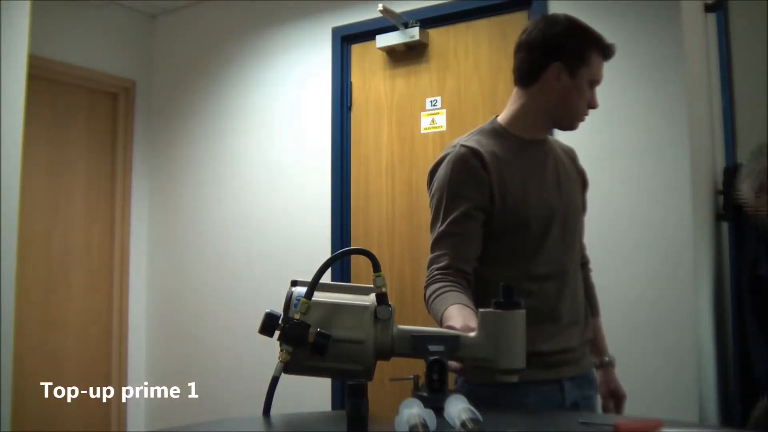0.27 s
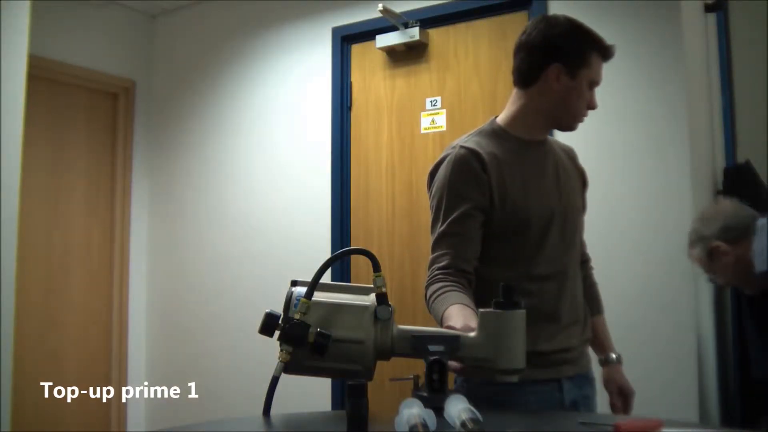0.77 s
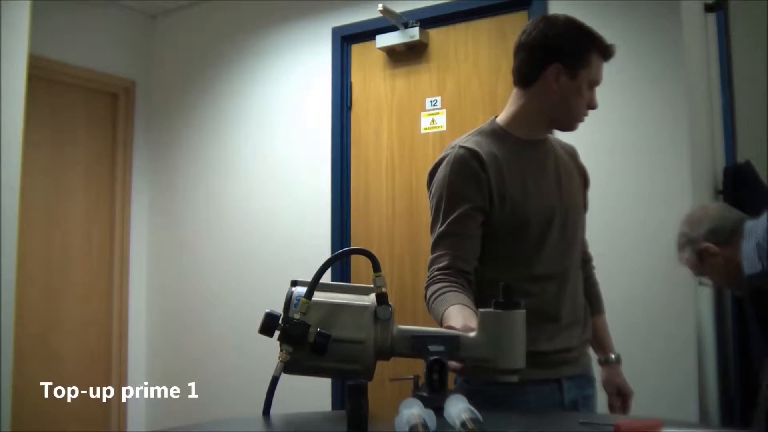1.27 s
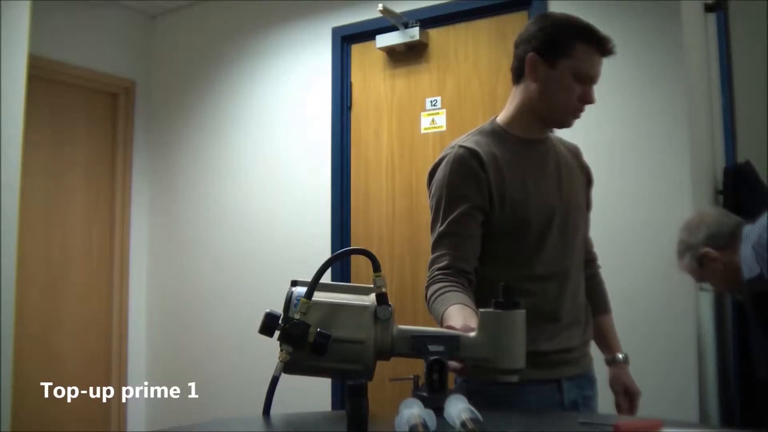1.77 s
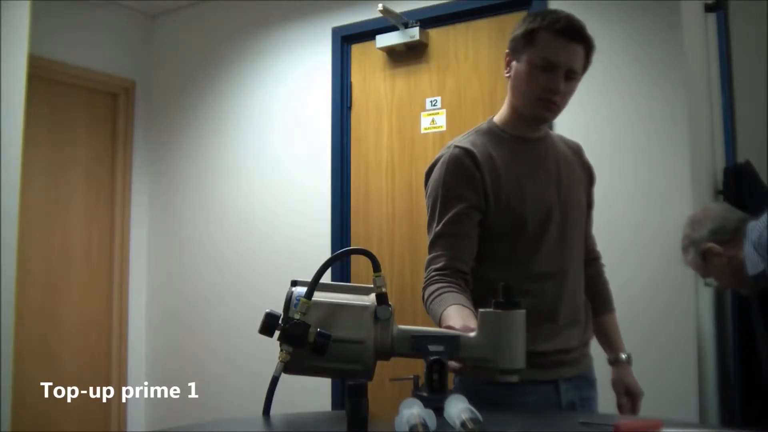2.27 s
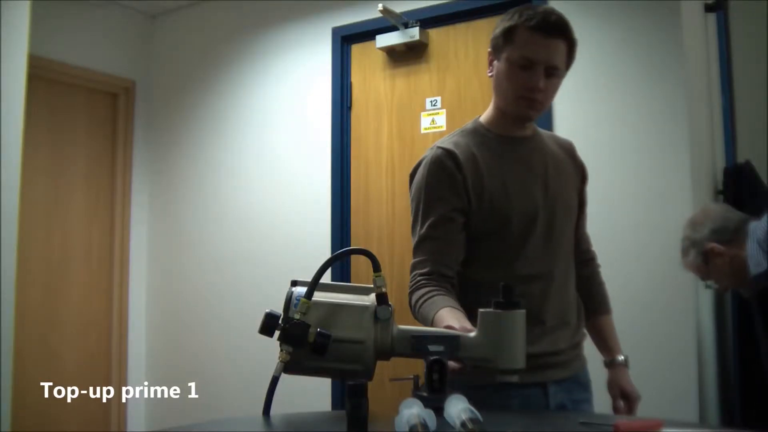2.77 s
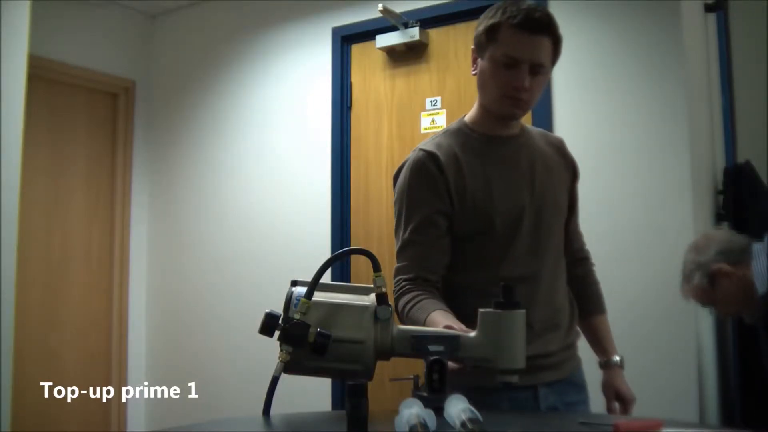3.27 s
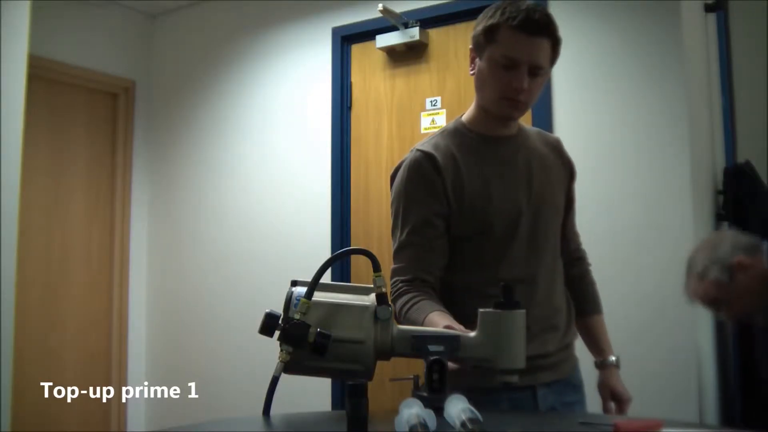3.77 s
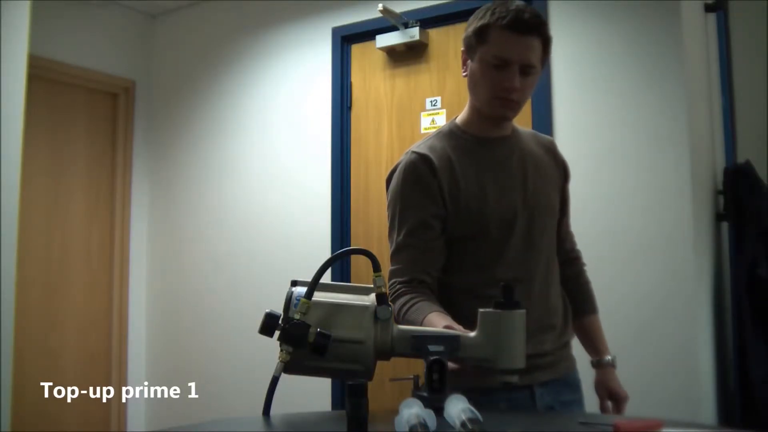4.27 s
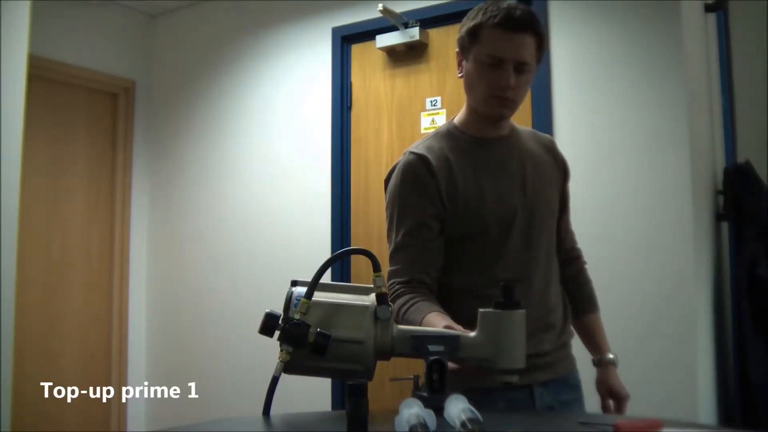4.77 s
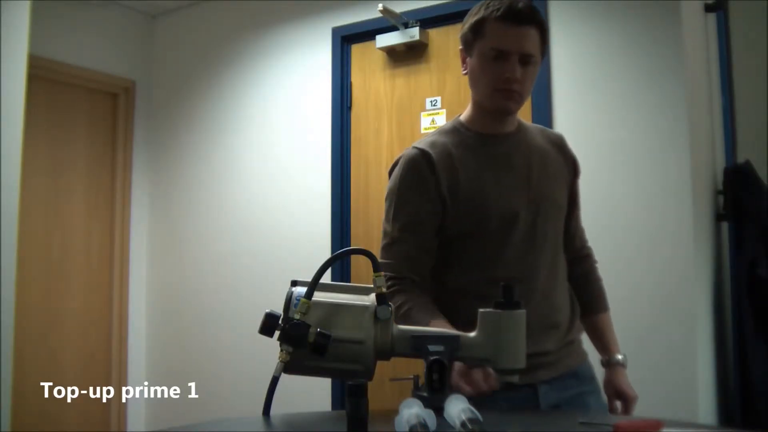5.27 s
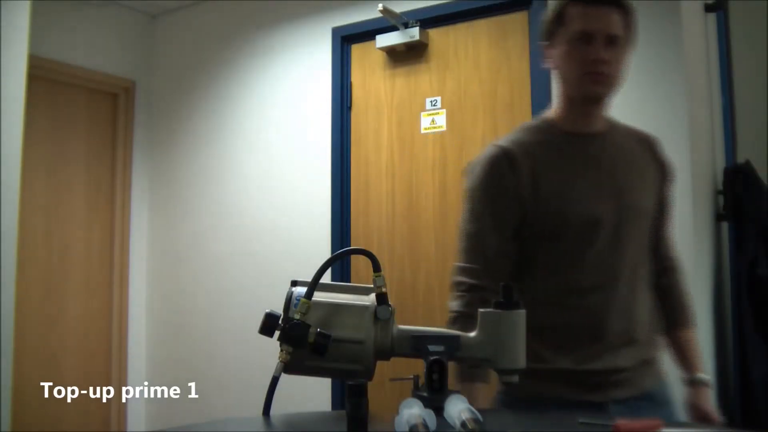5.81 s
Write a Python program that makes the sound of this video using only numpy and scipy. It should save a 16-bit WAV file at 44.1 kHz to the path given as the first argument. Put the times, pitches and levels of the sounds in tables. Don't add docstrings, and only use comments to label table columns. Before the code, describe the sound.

A steady air hiss in a small humming office, then a loud pop and roaring burst that fades, a metal tank knock, and quiet hum.

```python
import sys
import numpy as np
from scipy import signal
from scipy.fft import rfft, irfft, next_fast_len
from scipy.io import wavfile
from scipy.ndimage import uniform_filter1d

SR = 44100
rng = np.random.default_rng(int(sys.argv[2]) if len(sys.argv) > 2 else 0)


def level_to_linear(level):
    exponent = np.asarray(level, float) / 20
    return 10 ** exponent


def transcribe(signal):
    frames = np.atleast_2d(signal).T
    limited = np.clip(frames, -1, 1)
    pcm = np.round(limited * 32767).astype(np.int16)
    wavfile.write(sys.argv[1], SR, pcm)


N = 266476

# frequency in Hz, density in dB per Hz.
ROOM_COLOUR = [(9, -24), (15, 1), (54, -12), (90, -9), (132, -18), (198, -17.5), (315, -24.5), (530, -24.5),
               (893, -27.5), (2010, -31.5), (2190, -32.5), (6000, -39.5), (14000, -43), (15300, -51)]
# frequency in Hz, level in dB.
HUM = [
    (80, -49.5),
    (100, -39.5),
    (200, -51.5),
    (349, -51),
    (400, -59),
    (602, -63),
    (2010, -67),
]
# frequency in Hz, likeness from 0 to 1.
LIKENESS_ROOM = [(60, 0.75), (150, 1), (380, 0.98), (940, 0.99), (2370, 0.42), (5930, 0.28), (14800, 0.08)]
LIKENESS_LEAK = [(60, 0.94), (150, 0.97), (380, 1.0), (940, 1.0), (2370, 1), (5930, 0.66), (14800, 0.11)]
LIKENESS_BLAST = [(60, 0.95), (130, 1), (290, 1), (640, 1), (1400, 0.97), (3080, 0.83), (6760, 0.38),
                  (14800, 0.037)]
# frequency in Hz, left over right in dB.
STEREO_TILT = [(60, -1.2), (240, 0.0), (940, 0.35), (3740, 0.41), (14800, -0.3)]
# start in seconds, level in
# dB, centre in Hz, width in Hz, time to fall 60 dB in seconds.
SCUFFS = [(0.341, -37, 445, 80, 0.82), (0.588, -39, 496, 600, 0.89), (1.0, -39.5, 140, 80, 2),
          (1.02, -33, 955, 696, 0.96), (1.028, -34.5, 246, 307, 1.07), (1.03, -33, 2090, 500, .5),
          (1.19, -36.5, 443, 200, 0.96), (1.412, -13.5, 200, 300, 0.5), (1.472, -10, 212, 252, 0.19),
          (1.61, -36, 153, 60, 0.45), (2.27, -30.5, 634, 248, 1.1), (2.47, -29, 89, 60, 0.43),
          (2.572, -25, 300, 354, 0.72), (2.57, -31.5, 160, 70, 0.54), (2.63, -26, 587, 300, 0.62),
          (2.78, -23, 447, 260, 0.91), (2.899, -41, 201, 200, 3), (3.399, -36, 200, 61, 0.32),
          (1.43, -16.5, 566, 200, 0.71), (2.0, -37, 600, 90, 2.5), (1.03, -35, 50, 50, 2)]
# start in seconds, level in dB, centre in Hz,
# width in Hz, time to fall 60 dB in seconds.
BRUSHES = [(2.379, -38, 10500, 1500, .5), (4.8, -56, 6000, 6000, .03), (5.31, -46, 5000, 5000, 0.33),
           (5.37, -46, 3300, 1500, 0.14), (5.408, -39, 3230, 900, 0.15), (5.41, -46, 8000, 6000, 0.22),
           (5.44, -44, 1310, 300, 0.15), (5.485, -46, 10150, 500, 0.4), (5.49, -44, 6000, 9000, 0.42),
           (5.53, -42, 7500, 7000, 0.14), (5.71, -55, 4000, 4000, .4), (5.94, -49, 5000, 4000, 0.42),
           (5.992, -38.5, 1170, 400, .22)]
TANK_HZ = [888, 1021, 1110, 1420, 1539, 1914, 2374, 2589, 2850, 3057, 3117, 3556, 3908, 4036, 4775, 4820,
           5100, 5459, 6560, 7144, 9000, 10100]
# level in dB, time to fall 60 dB in seconds.
TANK_MODES = [(-7, 0.45), (-13, 0.59), (-9, 0.47), (-6, 0.27), (-3.5, 0.27), (-13.5, 1.4), (-6.5, 0.37),
              (-12, 0.47), (-3, 0.3), (-6, 0.38), (-7, 0.35), (-2.5, 0.28), (-2.5, 0.14), (1.5, 0.15),
              (-6, 0.28), (-9, 0.19), (-9, 0.25), (-9, 0.23), (-14, .2), (-10, 0.1), (-24, 0.12),
              (-23, 0.088)]
# time in seconds, level in dB.
KNOCKS = [
    (4.232, -21.5),
    (4.241, -27),
    (4.252, -27),
    (4.264, -36),
    (4.276, -37),
    (4.288, -33),
    (4.3, -35),
    (4.318, -39),
    (4.335, -39),
    (4.36, -35),
]
# peak in seconds, half length in seconds, level in dB.
DRONE = [
    (3.458, .02, -41),
    (3.522, .04, -36),
    (4.17, 0.16, -46),
    (4.261, 0.024, -29),
    (4.331, 0.041, -24.5),
    (4.422, 0.045, -42),
    (4.526, 0.024, -42.5),
    (4.575, 0.036, -51),
    (4.66, 0.043, -56),
]
# time in seconds, level in dB.
LEAK_LEVEL = [
    (0, -26.5),
    (1.36, -26.5),
    (2.3, -29.5),
    (2.9, -30.5),
    (3.5, -38.5),
    (4.222, -41.5),
    (4.236, -40),
    (4.434, -50.5),
    (4.7, -55),
    (5.0, -70),
]
# frequency in Hz, density in dB per Hz.
LEAK_COLOUR = [(710, -38), (1200, -11), (2480, -10.5), (3340, -0.5), (6120, -5.5), (9470, -5.5),
               (10500, -5.5), (12200, -6), (15300, -2.5)]
# frequency in Hz, width in Hz, boost in dB.
FITTING_MODES = [(3080, 2300, 11.4), (5540, 420, 6.9), (7000, 590, 4.2), (10600, 1160, 10.2),
                 (14900, 3900, 5.2)]
# time in seconds, peak in dB, swing in Hz.
POP = [
    (1.411, 0.5, 94),
]
# peak in seconds, half length in seconds, pitch in Hz,
# level in dB, drift in Hz per second.
HOSE_NOTES = [(1.424, 0.12, 2210, -12.5, 98), (1.464, 0.064, 4800, -5.5, 3000), (1.5, 0.1, 1676, -18, 100),
              (1.595, 0.13, 4750, -20.5, 100), (1.7, 0.33, 2310, -21.5, 100), (1.715, 0.21, 1740, -23, 200),
              (1.964, 0.12, 1756, -18, 100), (2.068, 0.052, 2410, -19.5, 2000),
              (2.09, 0.14, 4540, -23.5, 100), (2.238, 0.24, 2370, -22.5, -300),
              (2.297, 0.14, 3560, -24.5, -200), (2.4, 0.28, 1716, -32, 100), (2.45, 0.12, 6510, -25, -2500),
              (2.524, 0.14, 3390, -21.5, 100), (2.526, 0.062, 2500, -21, 500),
              (2.7, 0.068, 5150, -27.5, -4000), (2.73, .07, 2290, -26.5, -1000),
              (2.896, .1, 3680, -36, 100), (3.277, 0.25, 3410, -31, -1000), (3.63, 0.072, 9050, -29, -2000),
              (3.58, 0.053, 6100, -33, 100), (2.15, 0.15, 1593, -24.5, -500)]
# pitch in Hz, width in Hz.
NOTE_WIDTH = [(1750, 150), (2300, 380), (3500, 630), (4800, 2100), (5150, 880), (6500, 550), (9200, 1400)]
BLAST_EDGES_HZ = [380, 950, 3000, 6500]
# frequency in Hz, density in dB per Hz.
BLAST_COLOUR = [(59, -37), (100, -13), (123, 16), (312, -5), (446, -9), (495, -11), (1420, -11), (1830, -7),
                (1990, -7.5), (2350, -8.5), (8140, -12.5), (11400, -9), (15300, -16)]
# creep in dB, surge in dB, late surge decay in dB per second,
# flow in dB, flow sag in dB per second.
JET_BANDS = [
    (-30, -18, 251, -36.5, 3),
    (-30, -15.5, 53, -15.5, 10.5),
    (-29, -7.5, 151, -19, 8.5),
    (-22, -8.5, 204, -25, 7),
]
# peak in seconds, half length in seconds, centre in Hz,
# level in dB.
GUSTS = [(1.967, 0.18, 1680, -26), (2.331, 0.068, 1720, -19.5), (2.39, 0.045, 9000, -27.5),
         (2.51, 0.039, 4700, -29.5), (2.608, 0.05, 650, -29), (2.685, 0.12, 3470, -22.5),
         (2.788, 0.19, 600, -32.5), (3.077, .1, 2150, -22), (3.178, 0.12, 2200, -28),
         (3.575, 0.058, 7500, -28), (3.658, 0.11, 6260, -28.5), (3.56, .06, 600, -38)]

POP_S = POP[0][0]
QUICK = 0.79


def evened(x):
    return x / np.sqrt(np.mean(x ** 2) + 1e-20)


def read(points, hz):
    f, value = np.transpose(points)
    return np.interp(np.log(hz + 1), np.log(f + 1), value)


def hump(t, peak, half):
    return np.exp(-((t - peak) / (half * np.where(t < peak, QUICK, 1))) ** 2)


def wander(hz):
    size = next_fast_len(N)
    z = rfft(rng.standard_normal(size))
    slow = z / (1 + (np.fft.rfftfreq(size, 1 / SR) / hz) ** 2)
    return evened(irfft(slow, size)[:N])


def resonate(x, hz, width):
    turn = np.exp(2j * np.pi * np.cumsum(hz * np.ones(x.shape[-1])) / SR)
    r = np.exp(-np.pi * width / SR)
    return 2 * (turn * signal.lfilter([1 - r], [1, -r], x / turn)).real


def coloured(x, gain):
    size = next_fast_len(N)
    z = rfft(x, size) * gain(np.fft.rfftfreq(size, 1 / SR))
    return evened(irfft(z, size)[:, :N])


def echoes(t60, wet_db):
    t = np.arange(SR // 3) / SR
    tail = rng.standard_normal(len(t)) * level_to_linear(-60 * t / t60) * (t > .003)
    tail *= level_to_linear(wet_db) / np.linalg.norm(tail)
    tail[0] = 1
    return tail / np.linalg.norm(tail)


def air(likeness, patchy_db, wet_db, pan_db=0):
    frames, hz = N // 256 + 5, np.fft.rfftfreq(1024, 1 / SR)
    a, b, c, d, patches = rng.standard_normal((frames, 513, 5)).T
    patches = uniform_filter1d(patches, size=10, axis=0)
    patches = evened(uniform_filter1d(patches, size=14, axis=1))
    same = np.clip(read(likeness, hz), -1, 1)[:, None]
    left = a + 1j * b
    right = same * left + np.sqrt(1 - same ** 2) * (c + 1j * d)
    lean_db = (read(STEREO_TILT, hz)[:, None] + pan_db) / 2
    z = np.array([left, right]) * level_to_linear(patchy_db * patches + np.array([lean_db, -lean_db]))
    x = signal.istft(z, nperseg=1024, noverlap=768)[1][:, :N]
    return signal.oaconvolve(x, echoes(0.29, wet_db)[None], axes=1)[:, :N]


def room():
    t = np.arange(N) / SR
    wash = air(LIKENESS_ROOM, patchy_db=1.85, wet_db=-10.0, pan_db=-0.5)
    wash = coloured(wash, lambda hz: level_to_linear(read(ROOM_COLOUR, hz)))
    hum = 0
    for hz, db in HUM:
        level = level_to_linear(db + 0.44 * wander(hz=4.8)) * np.sqrt(2)
        hum = hum + level * np.sin(2 * np.pi * (hz * t + 0.023 * wander(hz=1.1)))
    hum = hum * level_to_linear(np.array([[-.8], [.8]]))
    fall_s, hold_s, back_s, depth_db = 0.23, 0.51, 0.52, -10
    duck_db = np.interp(t, POP_S + np.cumsum([0, fall_s, hold_s, back_s]), [0, depth_db, depth_db, 0])
    return level_to_linear(0.86 * duck_db - 37) * wash + level_to_linear(duck_db) * hum


def rustles():
    out, t = np.zeros((2, N)), np.arange(SR * 2 // 3) / SR
    for table, rise in [(SCUFFS, 0.039), (BRUSHES, 0.012)]:
        for s, db, hz, width, t60 in table:
            mid, side = rng.standard_normal((2, len(t)))
            wide = np.clip(hz / 9000, 0, 1)
            puff = mid + wide * np.array([side, -side])
            puff = evened(resonate(resonate(puff, hz, width), hz, width))
            puff = puff * np.minimum(t / (rise * t60), 1) * level_to_linear(db - 60 * t / t60)
            part = out[:, round(s * SR):][:, :len(t)]
            part += puff[:, :part.shape[1]]
    return out


def knock_ring(since, rise, t60):
    energy = 0
    for u, (_, db) in zip(since, KNOCKS):
        energy = energy + np.minimum(u / rise, 1) * level_to_linear(2 * db - 120 * u / t60)
    return np.sqrt(energy)


def tank():
    t, when = np.arange(SR) / SR, np.transpose(KNOCKS)[0]
    since = np.maximum(t + when[0] - when[:, None], 0)
    rattle = knock_ring(since, 0.003, 0.24) * rng.standard_normal(SR)
    clank = level_to_linear(4.5) * resonate(resonate(rattle, 910, 1050), 1100, 3000)
    clank += level_to_linear(-4) * resonate(resonate(rattle, 2300, 2300), 2600, 3600)
    clank += level_to_linear(-20) * resonate(resonate(rattle, 5200, 2000), 5200, 2500)
    for hz, (db, t60) in zip(TANK_HZ, TANK_MODES):
        beat, turn = rng.random(2)
        pair = 1 + 0.97 * np.cos(2 * np.pi * ((8 + 14 * beat) * t + turn))
        tone = pair * np.sin(2 * np.pi * (hz * t + turn))
        clank += level_to_linear(db - 9.0) * knock_ring(since, 0.0048, t60) * tone
    out = np.zeros((2, N))
    for ear in out:
        ear[round(when[0] * SR):][:SR] = signal.oaconvolve(clank, echoes(0.68, wet_db=-6.5))[:SR]
    note = np.sqrt(2) * np.sin(2 * np.pi * np.cumsum(732 + 4 * wander(hz=15)) / SR)
    bowing = sum(level_to_linear(db) * hump(np.arange(N) / SR, s, half) for s, half, db in DRONE)
    return out + note * bowing


def leak():
    def gain(hz):
        modes_db = sum(db / (1 + (2 * (hz - f) / w) ** 2) for f, w, db in FITTING_MODES)
        return level_to_linear(read(LEAK_COLOUR, hz) + modes_db)

    jet = coloured(air(LIKENESS_LEAK, patchy_db=1.5, wet_db=-6.5), gain)
    body = signal.oaconvolve(jet, signal.firwin(63, 7800, fs=SR)[None], "same")
    s, db = np.transpose(LEAK_LEVEL)
    level_db = np.interp(np.arange(N) / SR, s, db)
    fizz = level_to_linear(0.99 * np.minimum(level_db + 26.0, 0)) * (jet - body)
    return level_to_linear(level_db + 2.0) * (body + fizz)


def pop():
    out, t = np.zeros(N), np.arange(6000) / SR
    for s, db, hz in POP:
        flutter = 1.5 * np.cos(2 * np.pi * 650 * t) * level_to_linear(-60 * t / 0.018)
        swing = np.sin(2 * np.pi * hz * t) * level_to_linear(-60 * t / 0.051)
        swing += 0.15 * np.sin(2 * np.pi * 35 * t) * level_to_linear(-60 * t / 0.34)
        out[round(s * SR):][:6000] += level_to_linear(db + 2) * (flutter - swing)
    return out


def hose():
    jet = air(LIKENESS_BLAST, patchy_db=2.0, wet_db=-1.5)
    out, t = np.zeros((2, N)), np.arange(N) / SR
    for s, half, hz, db, drift in HOSE_NOTES:
        on = (abs(t - s) < 3 * half) & (t > POP_S)
        bend, width = hz + drift * (t[on] - s), read(NOTE_WIDTH, hz)
        note = evened(resonate(resonate(jet[:, on], bend, width), bend, width))
        out[:, on] += level_to_linear(db) * hump(t[on], s, half) * note
    return out


def band_level(t, lo, hi, creep_db, surge_db, dies, flow_db, sags):
    since = t - POP_S
    creep = np.clip((t - 1.37) / 0.0092, 0, 1) * level_to_linear(creep_db + 150 * np.minimum(since, 0))
    surge = level_to_linear(surge_db - 48 * since - dies * np.maximum(since - 0.11, 0))
    flow = level_to_linear(flow_db - sags * since - 34 * np.maximum(t - 3.66, 0))
    gusts = 0
    for s, half, hz, db in GUSTS:
        octaves = np.log2(np.sqrt(lo * hi) / hz)
        gusts = gusts + (level_to_linear(db - 7 * (octaves / 0.81) ** 2) * hump(t, s, half)) ** 2
    return np.where(since < 0, creep, np.sqrt(surge ** 2 + flow ** 2 + gusts))


def blast():
    jet, out, t = air(LIKENESS_BLAST, patchy_db=0.0, wet_db=-3.0), 0, np.arange(N) / SR
    edges = list(BLAST_EDGES_HZ) + [12500, SR]
    levels = [band_level(t, lo, hi, *band) for lo, hi, band in zip(edges, edges[1:], JET_BANDS)]
    levels.append(levels[-1] * level_to_linear(-12 - 5.8 * np.clip(t - 2.2, 0, 2)))
    for lo, hi, level in zip(edges, edges[1:], levels):
        def gain(hz):
            share = np.sqrt(1 / (1 + (lo / (hz + 1)) ** 10) - 1 / (1 + (hi / (hz + 1)) ** 10))
            return share * level_to_linear(read(BLAST_COLOUR, hz))

        out = out + level * coloured(jet, gain)
    return out * level_to_linear(.5 * wander(hz=25))


def scene():
    return room() + rustles() + tank() + leak() + pop() + hose() + blast()


def roll_off(x):
    return signal.sosfilt(signal.butter(12, 15450, fs=SR, output="sos"), x)


def record(dry):
    clipped = dry / (1 + (np.abs(dry) / .95) ** 6) ** (1 / 6)
    band_limit = signal.firwin(511, 15900, window=("kaiser", 9), fs=SR)
    mix = signal.oaconvolve(clipped, band_limit[None], "same")
    return roll_off(mix)


dry = scene()
out = record(dry)
transcribe(out)
```